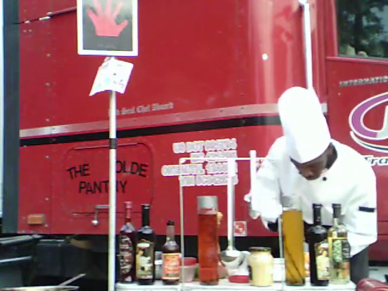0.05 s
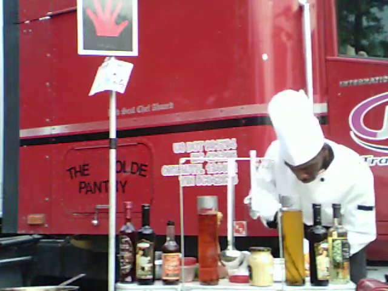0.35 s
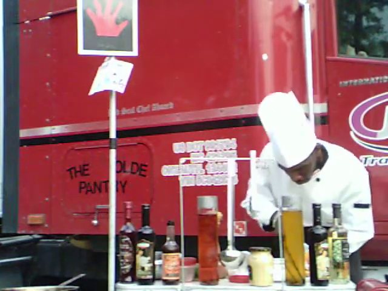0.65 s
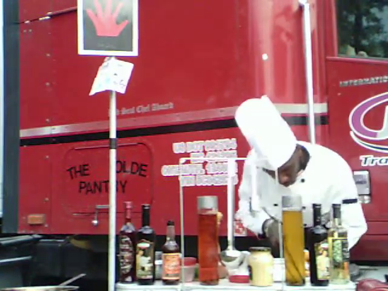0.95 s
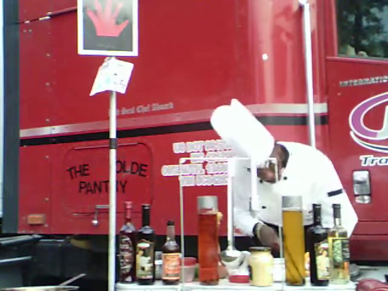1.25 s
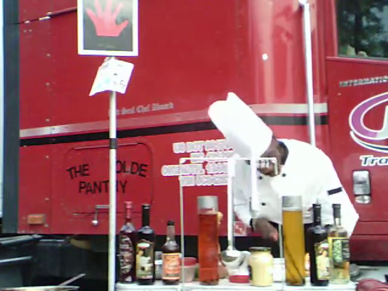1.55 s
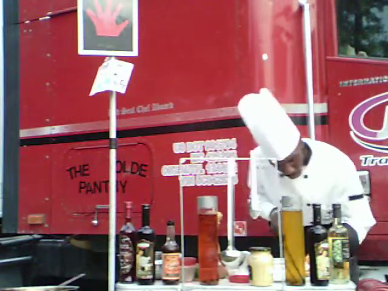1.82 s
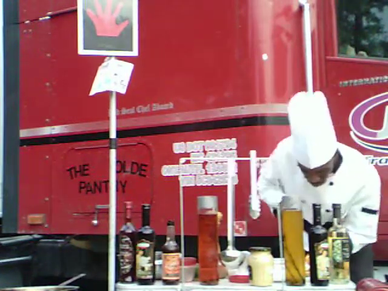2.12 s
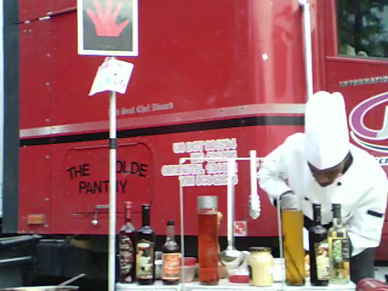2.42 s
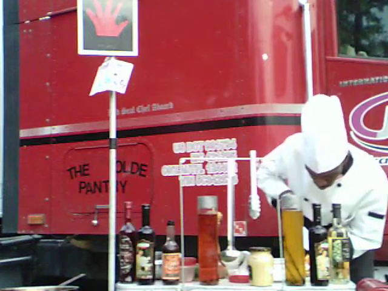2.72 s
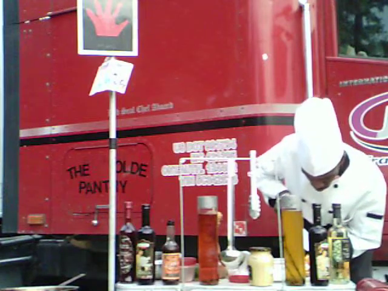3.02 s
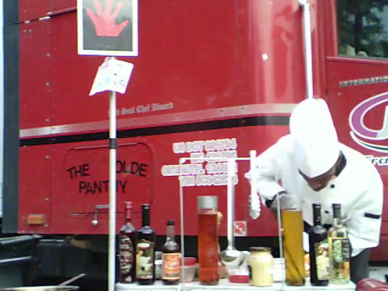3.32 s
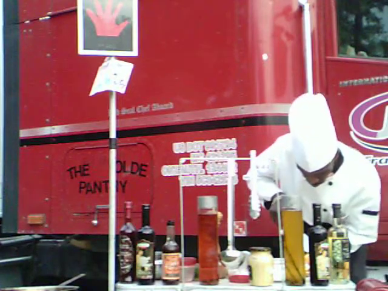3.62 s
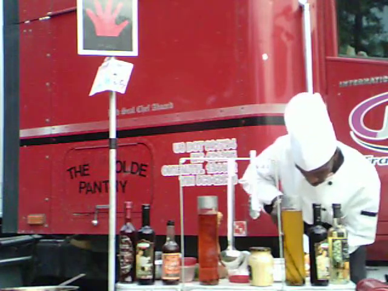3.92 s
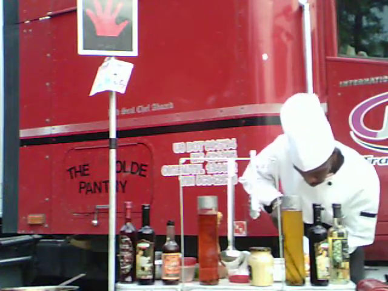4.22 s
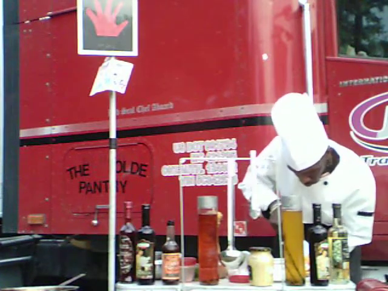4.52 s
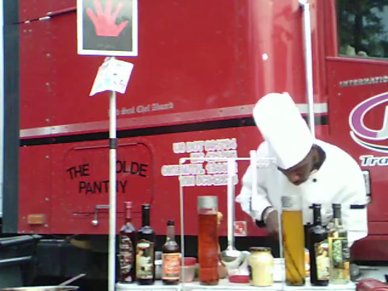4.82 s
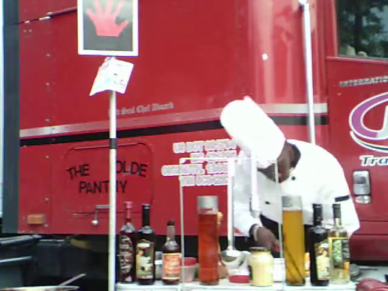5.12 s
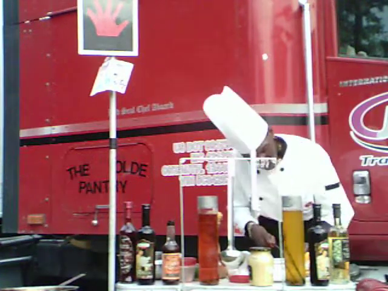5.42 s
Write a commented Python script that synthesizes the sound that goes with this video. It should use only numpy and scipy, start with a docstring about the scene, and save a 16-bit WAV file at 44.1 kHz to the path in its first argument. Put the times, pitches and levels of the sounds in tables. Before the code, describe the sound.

Outdoors near a parked truck, a low engine hum and a faraway rumble run on quietly, with a faint hiss behind them. Small birds in the surrounding trees repeat brief high whistles, chips and falling notes, each with a slight echo. A work table is tapped softly once early on and again near the end, when the birds give a few raspy buzzes and the engine hum swells.

```python
"""Among the trees around a parked truck, small birds whistle, chip and buzz.
Each note is an almost pure tone that slides in pitch; walls echo it and trunks scatter it.
Engines drone low and slowly change speed. Someone working at a table makes it ring with two soft knocks.
Behind it all lie a distant rumble and a thin hiss with faint whines."""
import sys
import numpy as np
from scipy import signal
from scipy.fft import rfft
from scipy.io import wavfile

SR = 44100
rng = np.random.default_rng(int(sys.argv[2]) if len(sys.argv) > 2 else 0)


def to_wav(sig):
    """Store sig (one row per channel, or 1-D mono) as 16-bit WAV at the path in sys.argv[1].

    Samples outside -1..1 are clipped; the rate is SR.
    """
    pcm = np.clip(np.atleast_2d(sig), -1, 1) * 32767
    pcm = np.round(pcm).astype(np.int16)
    wavfile.write(sys.argv[1], SR, pcm.T)  # frames by channels


N = 249406
TIME = np.arange(N) / SR
SCOOP_HZ, SETTLE_S = 50, 0.01318   # a bird's note starts a little high, then quickly settles


def birds(swell=0.35, rasp_hz=360, flutter_db=1.5, throat_width_hz=330, fade_db=3.5):
    """Each note is a tone that settles onto its pitch and sinks through it; rasp shakes the pitch."""
    out = np.zeros(N)
    shake = drift(340)
    flutter = from_db(flutter_db * drift(54))
    notes = songs() + chips() + peeps() + slurs() + buzzes()
    for start, length, hz, scoop, fall, level_db, rasp in notes:
        span = np.flatnonzero((TIME >= start) & (TIME < start + length))
        t = TIME[span] - start
        downhill = .5 - t / length
        slide = scoop * np.exp(-t / SETTLE_S) + fall * downhill
        pitch = hz + slide + rasp * rasp_hz * shake[span]
        tone = np.sqrt(2) * np.sin(2 * np.pi * np.cumsum(pitch) / SR)
        arch = np.abs(np.sin(np.pi * t / length)) ** swell
        # the throat is tuned to the main pitch, so the slides come out weaker
        throat = 1 / np.hypot(1, slide / throat_width_hz)
        out[span] += from_db(level_db + fade_db * downhill) * arch * throat * tone
    return out * flutter


# The notes of three songs. Each row: delay in seconds, length in seconds, pitch as a multiple of
# the song's pitch, fall in Hz, dB added to the song's level, rasp from 0 to 1.
TUMBLE_NOTES = [(0, 0.054, 0.99, 40.3, -1, .15), (0.07, 0.033, .822, 140, -9.5, .2),
                (.097, 0.03, .68, 150, -18, 0.15)]   # three quick steps down
WHISTLE_NOTES = [(0, .12, 1, 0, 0, .1), (.11, .1, .87, 242, -8.5, 0.47)]   # a pure note, then a raspy fall
TWO_STEP_NOTES = [(0, .18, 0.99, 10, -2.5, .08), (.058, 0.052, .915, 60, -4.5, .3),
                  (.148, .09, .89, 82, -3, .1)]   # two slow notes with a quick one between
# When each song is sung. Each row: start in seconds, pitch in Hz, level in dB.
TUMBLE_CALLS = [(.082, 3268, -53), (4.038, 3312, -56)]
WHISTLE_CALLS = [(.534, 3168, -54), (2.89, 3150, -55.5)]
TWO_STEP_CALLS = [(1.728, 2966, -62.5), (4.648, 2970, -61.5)]


def songs():
    """The birds repeat three songs, each time with its own pitch and level."""
    tunes = [(TUMBLE_CALLS, TUMBLE_NOTES, SCOOP_HZ),
             (WHISTLE_CALLS, WHISTLE_NOTES, 396),   # swoops in from much higher
             (TWO_STEP_CALLS, TWO_STEP_NOTES, SCOOP_HZ)]
    return [(start + delay, length, hz * ratio, scoop_hz, fall, db + note_db, rasp)
            for calls, notes, scoop_hz in tunes
            for start, hz, db in calls
            for delay, length, ratio, fall, note_db, rasp in notes]


# Short chips. Each row: start in seconds, pitch in Hz, level in dB, level of the low note in dB.
CHIP_CALLS = [(1.219, 3590, -59, -68.5), (2.405, 3595, -56.5, -77), (3.511, 3540, -61, -68),
              (5.33, 3600, -59.5, -73)]


def chips(length_s=.025, fall_hz=260, rasp=.18, low_delay_s=0.04448, low_length_s=.042, low_hz=2410):
    """Both sides of the bird's voice box sound at once; a soft low note follows."""
    notes = []
    for start, hz, db, low_db in CHIP_CALLS:
        notes += [(start, length_s, hz, SCOOP_HZ, fall_hz, db, rasp),
                  (start, length_s, hz * .9, SCOOP_HZ, 0, db - 3.5, rasp),   # lower, softer side
                  (start + low_delay_s, low_length_s, low_hz, 0, 0, low_db, 0)]
    return notes


# Plain peeps. Each row: start in seconds, length in seconds, pitch in Hz, level in dB.
PEEP_CALLS = [(1.653, .02, 3450, -65.5), (2.482, .025, 3070, -61), (2.577, 0.022, 3180, -61.5),
              (3.181, .033, 3060, -65), (3.224, .06, 3285, -64.5), (4.946, 0.034, 2420, -69.5),
              (5.042, 0.046, 3337, -59.5), (5.046, .05, 3006, -59.5)]


def peeps(fall_hz=20, rasp=.08):
    """Short, clean notes that barely fall in pitch."""
    return [(start, length, hz, SCOOP_HZ, fall_hz, db, rasp) for start, length, hz, db in PEEP_CALLS]


# Falling notes. Each row: start in seconds, pitch in Hz, level in dB.
SLUR_CALLS = [(1.462, 2930, -67), (2.174, 3014, -62.5)]


def slurs(length_s=.08, fall_hz=450, rasp=.12):
    """Notes that slide steeply down."""
    return [(start, length_s, hz, SCOOP_HZ, fall_hz, db, rasp) for start, hz, db in SLUR_CALLS]


# Buzzes. Each row: start in seconds, length in seconds, pitch in Hz, level in dB, rasp from 0 to 1.
BUZZ_CALLS = [(2.753, 0.058, 3350, -61.5, 0.54), (3.334, .076, 3280, -64.5, 0.53),
              (5.051, .34, 3620, -67.5, 0.95), (5.089, .29, 2810, -66, 0.39),
              (5.37, 0.097, 2814, -64, 0.66)]


def buzzes(fall_hz_per_s=396):
    """Hoarse notes with a shaky pitch; the longer they last, the further they fall."""
    return [(start, length, hz, SCOOP_HZ, fall_hz_per_s * length, db, rasp)
            for start, length, hz, db, rasp in BUZZ_CALLS]


# Echoes off the truck and nearby walls. Each row: delay in seconds, level in dB.
WALL_ECHOES = [(.026, -9), (.058, -9), (.114, -12)]


def outdoors(sound, tail_s=.8, tail_db=-3.3, build_s=0.0093):
    """Adds a few clear echoes and a fading tail scattered by trunks and leaves."""
    t = TIME[:SR]
    tail = rng.standard_normal(SR) * from_db(-60 * t / tail_s) * (1 - np.exp(-t / build_s))
    scattered = signal.fftconvolve(sound, tail / np.linalg.norm(tail))[:N]
    echoes = sum(from_db(db) * np.interp(TIME - delay, TIME, sound, left=0) for delay, db in WALL_ECHOES)
    return sound + echoes + from_db(tail_db) * scattered


# How three engine drones change. Each row: time in seconds, pitch in Hz, level in dB.
DEEP_ENGINE = [(0, 80.54, -51.5), (.7, 76.2, -46.5), (1.2, 70.77, -50), (1.8, 68, -53), (3.0, 67.5, -51.5),
               (4.2, 66.23, -57.5), (4.9, 65.94, -56), (5.2, 65.4, -46.5), (5.66, 66.8, -46)]
FALLING_ENGINE = [(0, 129, -49), (.4, 124.4, -49), (.85, 116.8, -54)]
UPPER_ENGINE = [(.8, 126.1, -52.5), (1.2, 130, -55), (1.8, 134.6, -56.5), (2.4, 134, -62.5),
                (3.0, 138.2, -70.5), (3.7, 136, -61.5)]


def engine(rows, octave_db, waver_db=1.5, fade_s=0.15):
    """An engine's firing makes a low tone with a weak octave above it, wavering in strength."""
    times, hz, level_db = np.transpose(rows)
    phase = 2 * np.pi * (np.cumsum(np.interp(TIME, times, hz)) / SR + rng.random())
    level = from_db(np.interp(TIME, times, level_db) + waver_db * drift(2.1))
    # fade in before the first row and out after the last
    outside_s = np.abs(TIME - np.clip(TIME, times[0], times[-1]))
    level *= np.exp(-outside_s / fade_s)
    return level * np.sqrt(2) * (np.sin(phase) + from_db(octave_db) * np.sin(2 * phase))


# Taps on the table; the last two blend into one knock. Each row: start in seconds, relative level in dB.
TABLE_TAPS = [(1.124, -44), (5.102, -44), (5.107, -36)]
# The table top's tones. Each row: pitch in Hz, relative level in dB, seconds to fade by 60 dB.
TABLE_TONES = [(320, -4.5, 0.081), (484, 3, 0.036), (1550, -14, .015)]


def knocks(gain_db=-6.0):
    """Each soft tap makes the table top ring for a moment."""
    taps, t = np.zeros(N), TIME[:SR // 4]
    for start, db in TABLE_TAPS:
        taps[round(start * SR)] = from_db(db + gain_db)
    ring = sum(from_db(db - 60 * t / ring_s) * np.sin(2 * np.pi * hz * t)
               for hz, db, ring_s in TABLE_TONES)
    return signal.fftconvolve(taps, ring)[:N]


# The rumble's mix of low and high. Each row: frequency in Hz, relative level in dB.
RUMBLE_SHAPE = [(12, -4.5), (28, 2), (55, -0.5), (97, -5), (125, -9), (165, -13.5), (230, -21.5),
                (330, -25.5), (560, -30.5), (820, -28), (1050, -34.5), (1450, -33), (1750, -43),
                (5000, -71)]
# Its slow swell. Each row: time in seconds, level in dB.
RUMBLE_LEVELS = [(0, -46), (1.2, -46), (2.2, -46.5), (3.6, -46.5), (4.6, -45.5), (5.66, -46)]


def rumble(surge_db=0.3):
    """Deep, distant noise that surges a little."""
    points_hz, shape_db = np.transpose(RUMBLE_SHAPE)
    deep_noise = noise(lambda hz: from_db(np.interp(np.log(hz), np.log(points_hz), shape_db)))
    level_db = np.interp(TIME, *np.transpose(RUMBLE_LEVELS)) + surge_db * drift(1.8)
    return from_db(level_db) * deep_noise


# Bands of hiss. Each row: centre in Hz, width in Hz, relative level in dB.
THIN_HISS_BANDS = [(2830, 1600, -3.5), (3190, 420, 3), (3978, 430, 5), (4550, 490, 2.5), (4704, 320, 3.5)]


def hiss(level_db=-63, shimmer_db=.5):
    """Thin, shimmering noise in bell-shaped bands, each with half its power at its edges."""
    def gain_at(hz):
        return np.sqrt(sum(from_db(db) ** 2 * .5 ** ((2 * (hz - centre) / width) ** 2)
                           for centre, width, db in THIN_HISS_BANDS))
    return noise(gain_at) * from_db(level_db + shimmer_db * drift(23))


# Electrical whines. Each row: pitch in Hz, relative level in dB.
WHINE_TONES = [(1200, -78.5), (5600, -76), (6701, -92), (7400, -80)]


def whines(gain_db=-6.0):
    """Faint electrical tones that hold steady."""
    return sum(from_db(db + gain_db) * np.sqrt(2) * np.sin(2 * np.pi * hz * TIME)
               for hz, db in WHINE_TONES)


def from_db(db):
    """Turns decibels into a number to multiply by."""
    return 10 ** (np.asarray(db) / 20)


def noise(gain_at, size=2 ** 19):
    """Steady noise with a power of 1; gain_at(hz) sets how strong each frequency is."""
    hz = np.maximum(np.fft.rfftfreq(size // 2, 1 / SR), 1)
    shaped = np.fft.irfft(rfft(rng.standard_normal(size // 2)) * gain_at(hz))[:N]
    return shaped / np.sqrt(np.mean(shaped ** 2) + 1e-20)


def drift(rate):
    """A random wobble of typical size 1, turning up to about `rate` times a second."""
    return noise(lambda hz: 1 / (1 + (hz / rate) ** 2))


def scene():
    """Birds in the trees over engines, knocks and the steady background."""
    birdsong = outdoors(birds())
    engines = engine(DEEP_ENGINE, octave_db=-41.0)
    engines += engine(FALLING_ENGINE, octave_db=-17)
    engines += engine(UPPER_ENGINE, octave_db=-18.5)
    return (birdsong + engines + knocks() + rumble() + hiss() + whines())[None]


def record(dry, noise_db=-64.5, rolloff_hz=10300, cutoff_hz=12000, offset=0.019):
    """The microphone adds its own hiss, cuts the highest treble and shifts the wave slightly off zero."""
    mic_hiss = from_db(noise_db) * noise(lambda hz: 1 / np.sqrt(1 + (hz / rolloff_hz) ** 32))
    treble_cut = signal.ellip(10, .1, 80, cutoff_hz, fs=SR, output="sos")
    return signal.sosfilt(treble_cut, dry + mic_hiss) + offset


dry = scene()
out = record(dry)
to_wav(out)
```